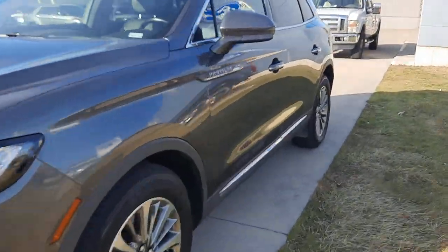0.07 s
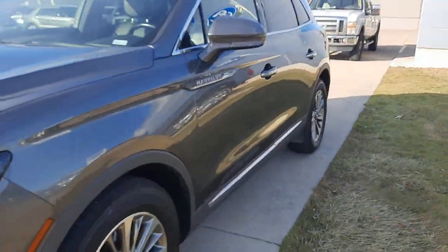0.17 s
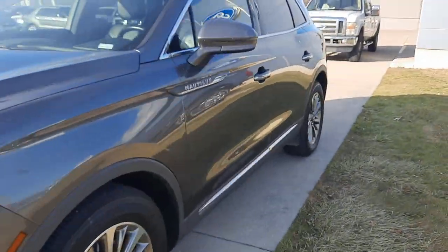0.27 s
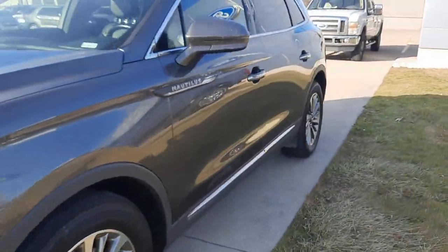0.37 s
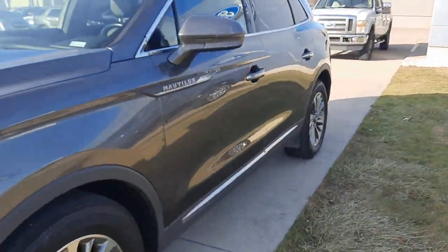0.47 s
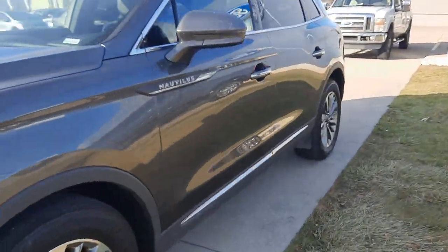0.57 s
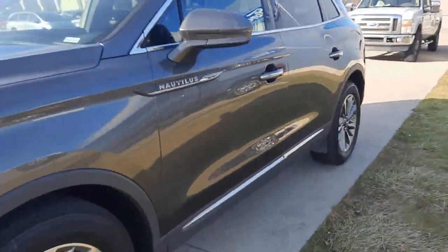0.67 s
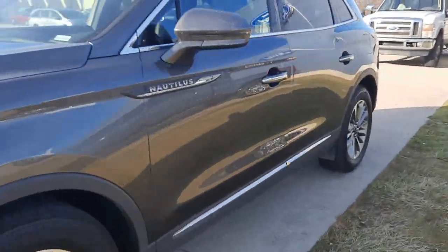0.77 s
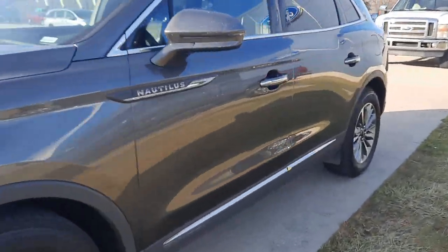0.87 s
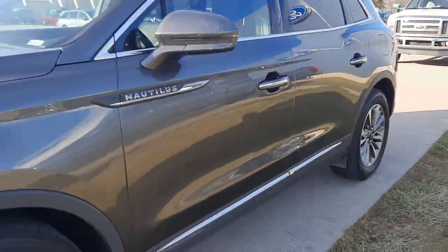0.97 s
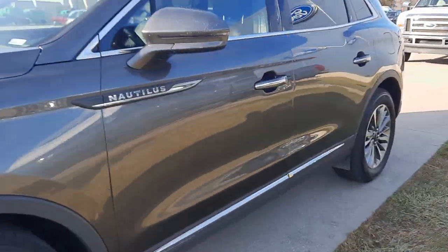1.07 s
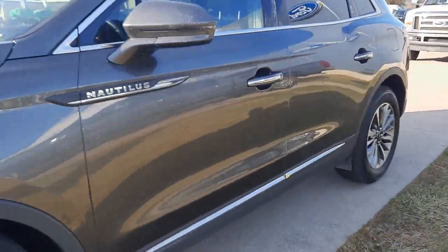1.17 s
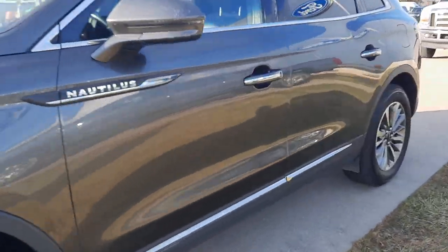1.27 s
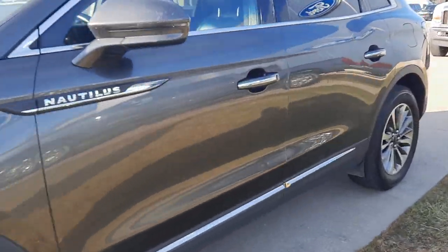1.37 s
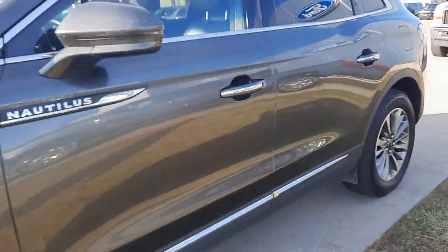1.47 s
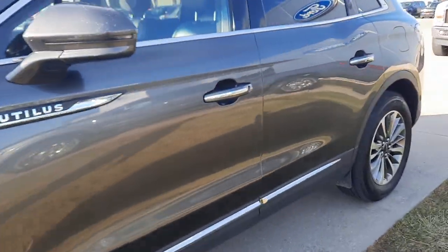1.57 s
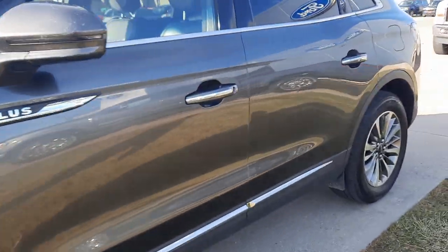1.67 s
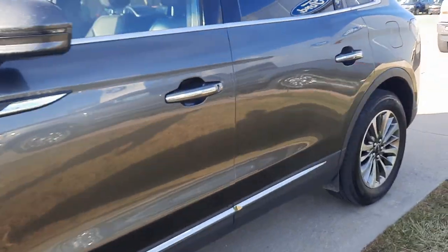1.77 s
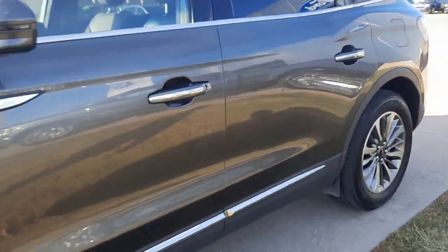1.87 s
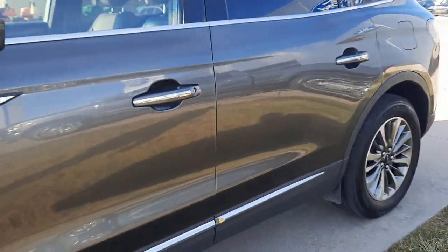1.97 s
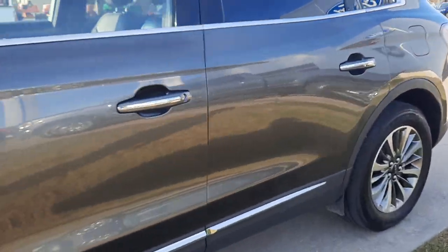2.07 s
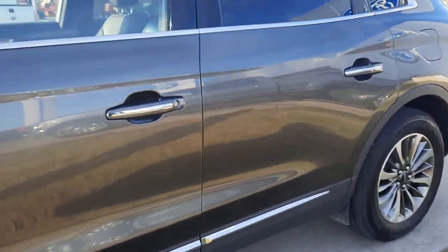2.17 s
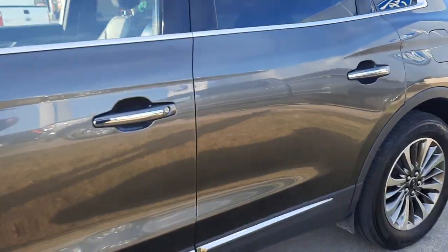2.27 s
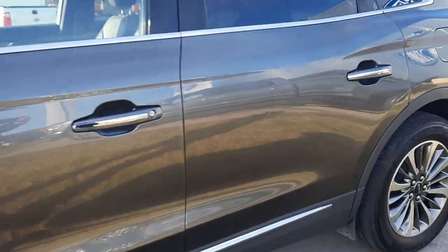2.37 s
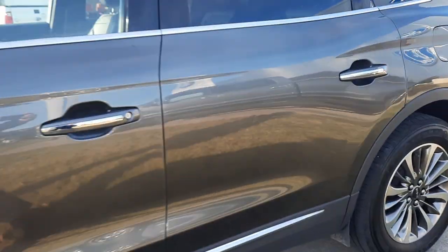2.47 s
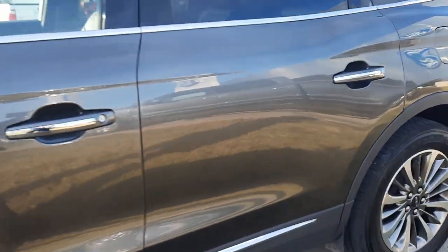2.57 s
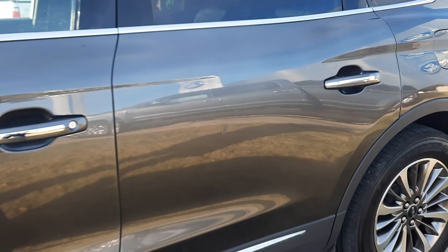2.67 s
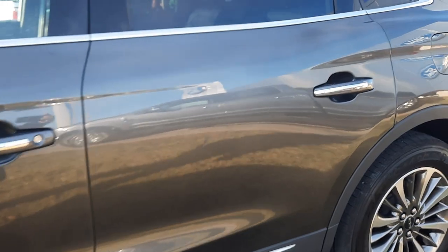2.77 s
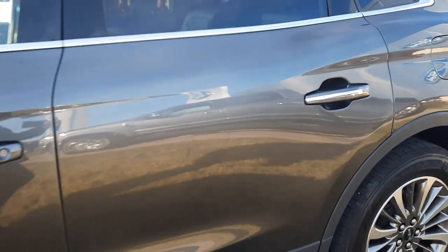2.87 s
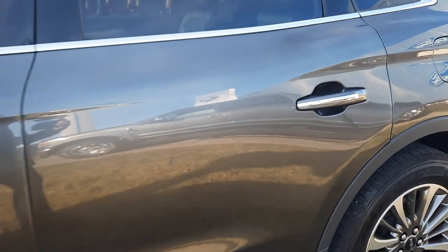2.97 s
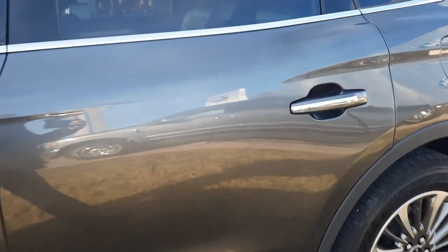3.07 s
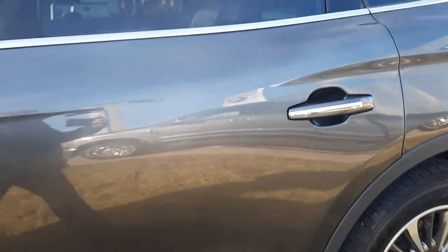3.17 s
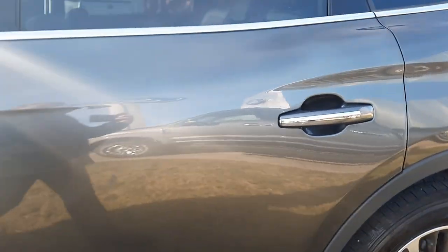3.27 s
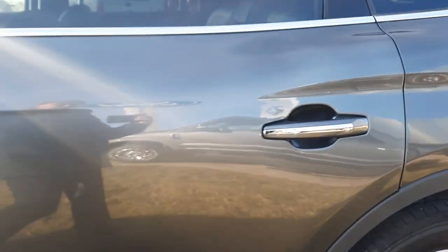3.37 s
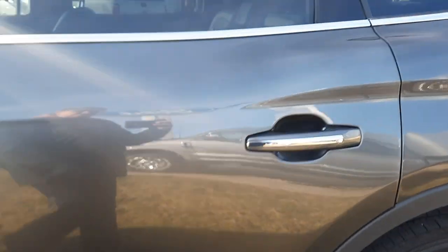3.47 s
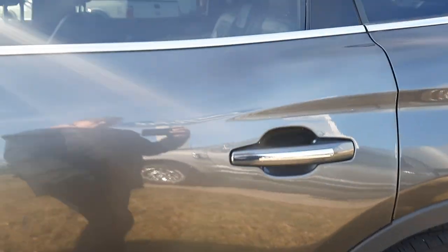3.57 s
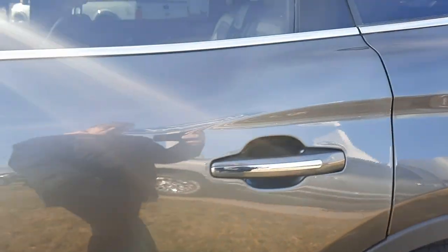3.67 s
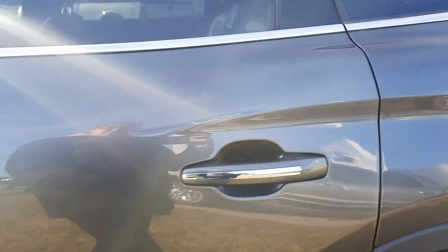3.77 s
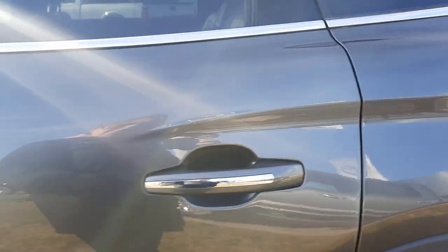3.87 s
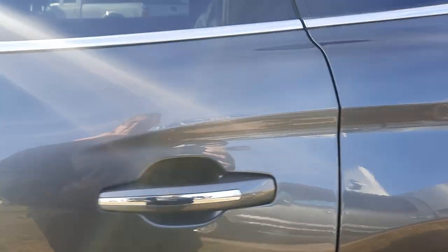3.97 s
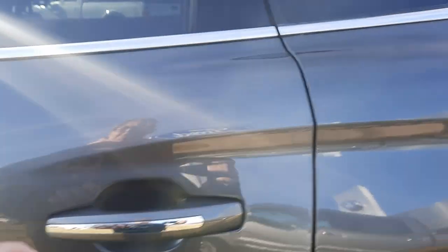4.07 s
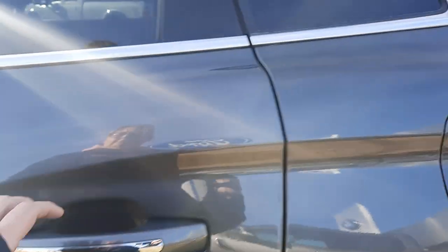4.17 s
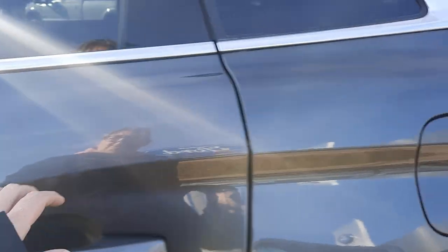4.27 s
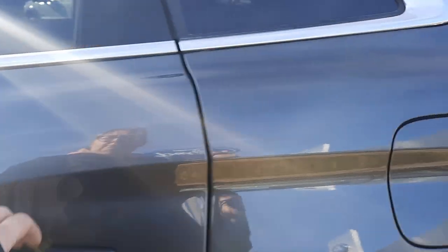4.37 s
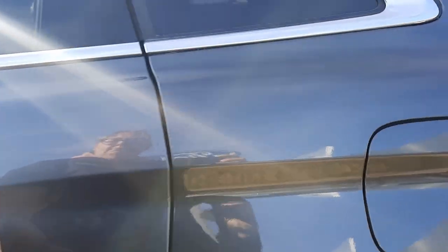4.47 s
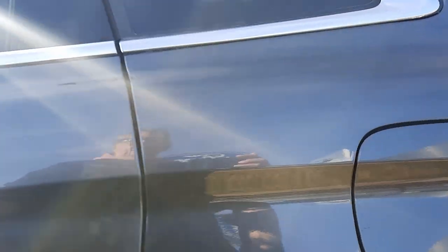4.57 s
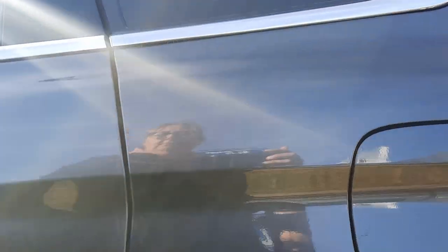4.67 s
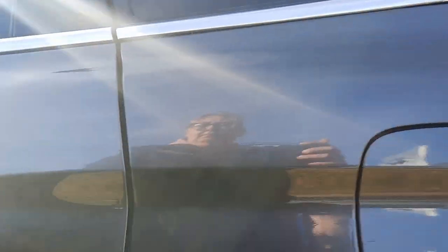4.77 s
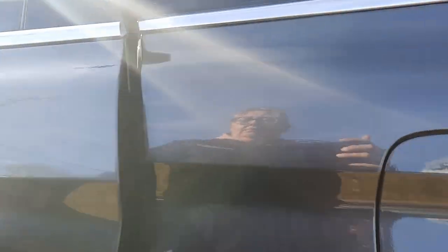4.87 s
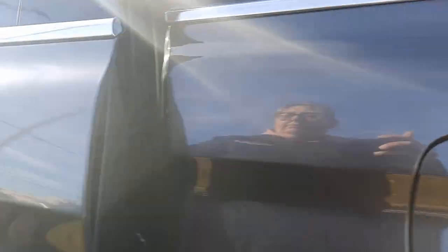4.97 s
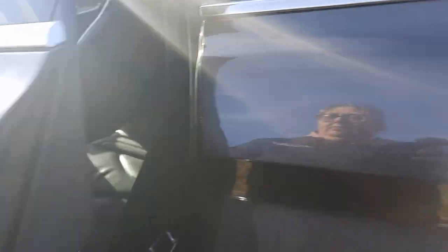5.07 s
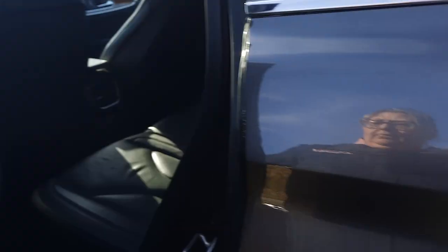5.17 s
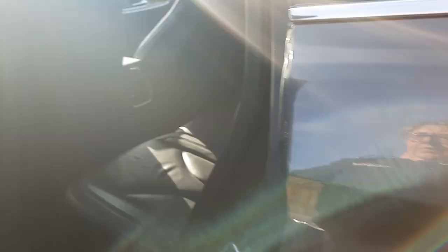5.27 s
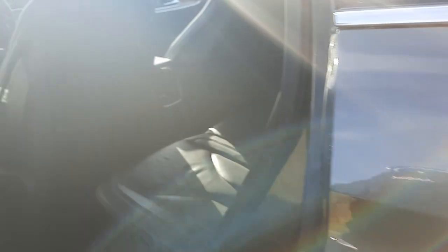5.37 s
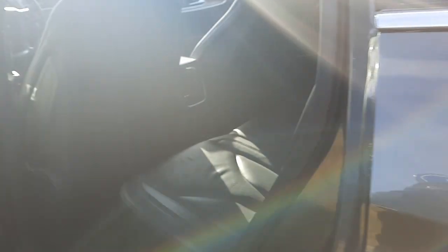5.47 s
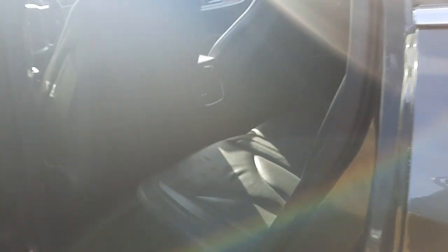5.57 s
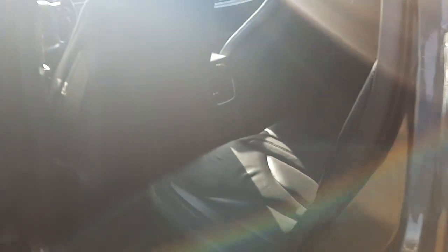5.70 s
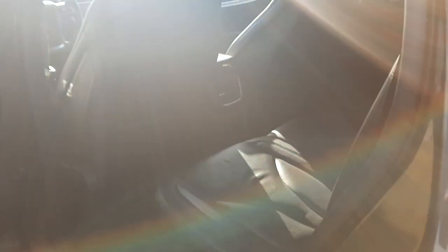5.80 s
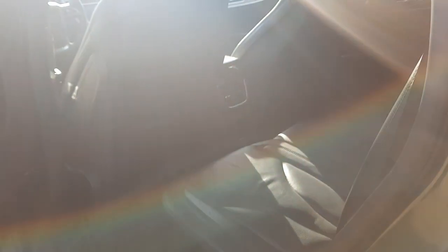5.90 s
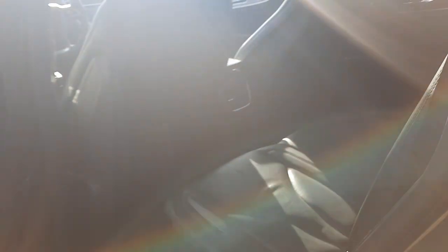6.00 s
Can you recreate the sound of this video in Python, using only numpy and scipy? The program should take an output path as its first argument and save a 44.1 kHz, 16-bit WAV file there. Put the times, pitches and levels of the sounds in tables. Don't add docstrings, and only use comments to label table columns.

```python
import sys
import numpy as np
from scipy import signal
from scipy.fft import rfft, irfft, next_fast_len
from scipy.io import wavfile
from scipy.ndimage import uniform_filter1d, map_coordinates

SR = 44100
rng = np.random.default_rng(int(sys.argv[2]) if len(sys.argv) > 2 else 0)


def volts_from_db(level):
    exponent = np.asarray(level, float) / 20
    return 10 ** exponent


def wav_record(signal):
    frames = np.transpose(np.atleast_2d(signal))
    bounded = np.clip(frames, -1, 1)
    quanta = np.round(bounded * 32767).astype(np.int16)
    wavfile.write(sys.argv[1], SR, quanta)


N = 266187

PORT_LAG = 0.000508
# (time [s], level [dB])
NEAR_LANE = [(0.0, -52), (.5, -52.5), (0.8, -50), (1.3, -50.5), (1.7, -55), (2.2, -53), (3.1, -56),
             (4.0, -57.5), (4.7, -57), (4.95, -58.5), (5.09, -54), (5.3, -57.5), (5.6, -63), (6.04, -56)]


def unit(x):
    return x / np.sqrt(np.mean(x ** 2) + 1e-20)


def along(points, hz):
    f, v = np.transpose(points)
    return np.interp(np.log(hz + 1), np.log(f + 1), v)


def curves(rows):
    s, *cols = np.transpose(np.vstack(rows))
    return np.array([np.interp(np.arange(N) / SR, s, c) for c in cols])


def wobble(rate):
    coarse = np.arange(0, N + 16, 16)
    knots = map_coordinates(rng.standard_normal(int(N * rate / SR) + 4), [coarse * rate / SR])
    return np.interp(np.arange(N), coarse, knots)


def filtered(x, response):
    m = next_fast_len(x.shape[-1] + 2048, real=True)
    spectrum = rfft(x, m) * response(np.fft.rfftfreq(m, 1 / SR))
    return irfft(spectrum, m)[..., :x.shape[-1]]


def later(pair, lag):
    return filtered(pair, lambda hz: np.exp(-2j * np.pi * hz * np.array([[0], [lag]])))


def panned(db):
    return db * np.array([[.5], [-.5]])


def shaded(pair):
    # (frequency [Hz], left over right [dB])
    shade = [(100, 1.5), (700, 4.5), (2400, 1.5), (4400, 0.5), (7500, -4.5), (12000, -1)]
    return filtered(pair, lambda hz: volts_from_db(panned(along(shade, hz))))


def rush(spectrum, patchy_db, lag):
    # (frequency [Hz], left-right likeness [0 to 1])
    alike = [(100, 0.86), (600, 0.64), (1400, 0.62), (2600, 0.37), (5000, 0.27), (13000, 0.16)]
    z = signal.stft(rng.standard_normal((2, N + 512)), nperseg=512)[2]
    field = uniform_filter1d(rng.standard_normal(z.shape[1:]), size=6, axis=0)
    field = uniform_filter1d(field, size=10, axis=1)
    patchy = signal.istft(z * volts_from_db(patchy_db * unit(field)), nperseg=512)[1][:, :N]
    m = next_fast_len(N, real=True)
    a, b = rfft(patchy, m)
    hz = np.fft.rfftfreq(m, 1 / SR)
    turn = np.arccos(np.clip(along(alike, hz), -1, 1)) / 2
    mid, side = a * np.cos(turn), b * np.sin(turn)
    delay = np.exp(-2j * np.pi * hz * lag)
    pair = volts_from_db(along(spectrum, hz)) * [mid + side, (mid - side) * delay]
    return unit(irfft(pair, m)[:, :N])


def add(track, s, sound):
    part = track[..., round(s * SR):][..., :sound.shape[-1]]
    part += sound[..., :part.shape[-1]]


def distances(s, half):
    t = np.arange(0, N + 64, 64) / SR
    return t, np.abs(t - s[:, None]) / np.abs(half[:, None])


def traffic():
    # (time [s], roar [dB])
    road = [(0.0, -44), (0.42, -47), (0.79, -43), (1.35, -44), (1.49, -41), (1.62, -45), (1.75, -43),
            (2.1, -47), (3.0, -44), (3.75, -47), (4, -44.5), (4.16, -48.5), (4.44, -45), (5.09, -48),
            (5.3, -46.5), (6.04, -48)]
    # (frequency [Hz], level [dB per Hz])
    roar_color = [(200, -53), (260, -1), (330, 4), (430, -4.5), (600, -11.5), (800, -15.5), (1000, -17.5),
                  (1300, -32)]
    tyre_color = [(700, -11), (950, -2.5), (1300, 0.5), (1700, -2.5), (1950, -7), (2800, -11.5),
                  (4200, -11.5), (16000, -24)]
    self_noise_color = [(2000, -20), (4000, -4.5), (7000, 3), (10000, 5), (16000, -11)]
    roar_db, = curves(road)
    hiss_db, = curves(NEAR_LANE)
    roar = volts_from_db(roar_db + 3 + 1.3 * wobble(9)) * rush(roar_color, patchy_db=3.5, lag=0.000241)
    self_noise = volts_from_db(-56.0) * rush(self_noise_color, patchy_db=1.5, lag=PORT_LAG)
    tyres = volts_from_db(hiss_db + 6 + 0.67 * wobble(7)) * rush(tyre_color, patchy_db=1.8, lag=0.000441)
    return roar + self_noise + tyres


def rubbing():
    # (time [s], half length [s], swish [dB], fine hiss over swish [dB])
    rubs = [(.07, .15, -63, -2), (0.398, .07, -57.5, -13), (0.657, 0.081, -55, -2), (0.75, .09, -53.5, -8),
            (0.922, 0.03, -56.5, -6), (1.38, 0.18, -57, 9.5), (1.522, .08, -57.5, 11),
            (2.008, 0.11, -57.5, 1), (2.28, 0.092, -64, -7), (2.4, .12, -64, -1), (2.493, 0.017, -49.5, -5),
            (2.532, 0.034, -48.5, 1.5), (2.778, 0.14, -52.5, -5), (2.893, .04, -50.5, 0),
            (3.015, 0.14, -55.5, -3), (3.107, .06, -61, 10), (3.236, 0.037, -57, 5), (3.345, .11, -54, 3),
            (3.52, .05, -60, 10.5), (3.61, .1, -61, 9), (4.03, .12, -61, 3), (4.333, .1, -59, 4),
            (4.493, 0.045, -57.5, 5), (4.79, 0.12, -53.5, 2), (4.89, .04, -59, 7), (5.022, .09, -58.5, 6),
            (5.138, 0.15, -54.5, 1.5), (5.252, 0.058, -52.5, 0), (5.413, 0.023, -57, -1.2),
            (5.923, 0.055, -62.5, 11)]
    last_rub = (6, 0.06, -54.5, -2)
    fade_db, flatness, rest_db = 12.5, 1.36, -76
    s, half, db, fine_db = np.transpose(rubs + [last_rub])
    t, far = distances(s, half)
    gains = []
    for top_db in (db, db + fine_db):
        each = volts_from_db(top_db[:, None] - fade_db * far ** flatness)
        gains.append(np.interp(np.arange(N) / SR, t, volts_from_db(rest_db) + each.max(axis=0)))
    return gains


def clothes():
    # (frequency [Hz], level [dB per Hz])
    swish_color = [(2500, -10), (4200, -7), (5500, -2), (6800, 0), (8500, -4.5), (11000, -7)]
    fine_color = [(7000, -14), (10000, -2.5), (13000, 1), (16000, -4.5)]
    # (time [s], length [s], from [Hz], to [Hz], level [dB])
    squeaks = [
        (2.8, .025, 15500, 14200, -42),
        (2.405, .012, 15200, 14000, -50),
    ]
    swish, fine = rubbing()
    rub = wobble(30)
    out = swish * volts_from_db(7.5 + 1.0 * rub) * rush(swish_color, patchy_db=3.0, lag=PORT_LAG)
    out = out + fine * volts_from_db(0.5 + 0.98 * rub) * rush(fine_color, patchy_db=3.5, lag=PORT_LAG)
    for s, length, from_hz, to_hz, db in squeaks:
        hz = np.linspace(from_hz, to_hz, round(length * SR))
        add(out, s, volts_from_db(db) * np.hanning(len(hz)) * np.sin(2 * np.pi * np.cumsum(hz) / SR))
    return out


def ducking(rows):
    s, half, depth_db = np.transpose(rows)
    t, far = distances(s, half)
    cut_db = (depth_db[:, None] * np.clip(1 - far, 0, 1)).max(axis=0)
    return np.interp(np.arange(N) / SR, t, cut_db)


def bass_level():
    # (time [s], strength [dB])
    wind_strength = [(0.0, -41), (0.2, -38), (0.5, -44), (1.06, -40.5), (1.55, -35.5), (1.81, -29.5),
                     (2.06, -41), (2.28, -34), (2.6, -35.5), (2.84, -31.5), (3.16, -37.5), (4.1, -38.5),
                     (4.63, -35), (5.18, -30.5), (5.38, -26), (5.52, -34), (5.76, -26.5), (5.88, -38)]
    # (time [s], half length [s], depth [dB])
    left_ducks = [(.05, 0.088, 27), (.3, .08, 20), (.42, 0.063, 22), (1.282, .04, 9), (1.382, .05, 13),
                  (1.46, .05, 12), (1.55, .04, 8), (1.9, .04, 8), (1.61, 0.045, 9), (1.68, 0.052, 30),
                  (1.81, 0.11, 21), (1.98, 0.081, 15), (2.43, 0.12, 30), (2.49, 0.053, 22),
                  (2.66, 0.092, 19), (2.77, .07, 28), (2.89, 0.044, 8), (3.09, 0.037, 6), (3.51, .05, 6),
                  (3.635, .05, 6), (4.774, 0.036, 4), (5.911, .04, 10), (3.88, 0.057, 37),
                  (4.02, 0.067, 14), (4.15, 0.11, 30), (4.54, 0.087, 17), (5.06, 0.082, 19),
                  (5.25, .07, 34), (5.4, 0.16, 9), (5.65, .03, 19), (5.79, 0.085, 9)]
    right_ducks = [(.341, .05, 8), (.452, 0.037, 5.5), (.863, .05, 10), (1.382, .04, 6), (3.11, .06, 8.2),
                   (3.581, .04, 10), (4.584, .04, 6), (5.262, 0.045, 7.3), (2.97, .04, 7), (1.88, .04, 8),
                   (5.69, 0.034, 6), (5.874, .04, 7), (1.64, 0.04, 10), (2.46, 0.036, 12), (2.9, 0.06, 20),
                   (3.51, 0.042, 17), (3.65, 0.064, 13), (3.88, 0.042, 5.9), (5.06, 0.084, 7),
                   (5.65, 0.033, 12), (6.03, 0.075, 7.8)]
    return curves(wind_strength) - [ducking(left_ducks), ducking(right_ducks)]


def wind(level_db):
    # (frequency [Hz], level [dB per Hz])
    gust = [(20, -46), (45, -5), (80, 0), (130, -2.5), (200, -7), (245, -11), (280, -63)]
    spill_color = [(220, -40), (270, 0.5), (360, -3), (500, -23), (1000, -50)]
    windy = np.clip((level_db.max(axis=0) + 42) / 12, 0, 1)
    own = unit(filtered(rng.standard_normal((2, N)), lambda hz: volts_from_db(along(gust, hz))))
    mix = np.sqrt(1 - windy) * rush(gust, patchy_db=1.5, lag=0.00027) + np.sqrt(windy) * own
    lumps = volts_from_db(3.3 * np.array([wobble(22.03), wobble(22)]))
    spill = unit(filtered(rng.standard_normal((2, N)), lambda hz: volts_from_db(along(spill_color, hz))))
    return volts_from_db(level_db + 0.1) * unit(lumps * mix) + volts_from_db(level_db - 12.5) * windy ** 2 * lumps * spill


def hum(level_db):
    # (time [s], level [dB])
    swells = [(0.0, -61), (0.57, -49), (1.09, -41.5), (1.25, -55), (1.78, -51), (2.21, -40.5), (2.43, -51),
              (2.75, -47.5), (2.98, -42), (3.19, -47.5), (3.37, -40), (3.49, -51.5), (4.14, -53),
              (4.43, -44.5), (4.71, -41.5), (5.15, -43.5), (5.25, -53), (5.8, -41.5)]
    # (multiple of the main tone, level [dB])
    hum_parts = [(1, 2), (2, -13.5), (2.5, -24), (.4, -4)]
    turn = 2 * np.pi * 199.1 * np.arange(N) / SR
    parts = [volts_from_db(db + 1.46 * wobble(4.99)) * np.sin(k * turn + 0.59 * wobble(6)) for k, db in hum_parts]
    return volts_from_db(curves(swells) + 1.5 + np.minimum(level_db + 44.5, 0)) * sum(parts)


def whine():
    # (frequency [Hz], level [dB])
    whine_lines = [(1205, -60), (1258, -60), (1340, -65), (1998, -64.5)]
    lane_db, = curves(NEAR_LANE)
    t = np.arange(N) / SR
    lines = 0
    for hz, db in whine_lines:
        lines = lines + volts_from_db(db + 3.6 * wobble(4)) * np.sin(2 * np.pi * hz * t + 1.6 * wobble(12))
    return later(volts_from_db(1.5 * (lane_db - lane_db.max())) * np.array([lines, lines]), 0.0004)


def puffs():
    # (time [s], peak [dB], frequency [Hz], left over right [dB])
    pushes = [(.137, -33, 300, -2.5), (.142, -25, 150, -3), (.239, -37, 134, -7), (.576, -40, 64, -3),
              (.654, -36, 80, 1.5), (.81, -37, 69, 1.5), (.953, -33, 69, 1.5), (1.05, -33, 70, 1.5),
              (1.113, -38, 118, -1.5), (1.2, -34, 75, -1.5), (1.33, -33, 65, -1.5), (1.495, -34, 80, -4),
              (1.594, -30, 220, -3), (1.666, -35, 430, -1.5), (1.734, -28, 150, -5), (1.747, -32, 320, -3),
              (1.79, -35, 118, -9), (1.828, -35, 69, -12), (2.275, -31, 96, 1.5), (2.645, -34, 100, -8),
              (2.687, -31, 200, -2.5), (2.704, -29, 240, -2.5), (2.792, -32, 86, -11),
              (2.838, -31, 64, 2.5), (3.294, -35, 75, 1.5), (3.363, -34, 86, -1.5), (3.46, -29, 102, -7),
              (3.753, -31, 107, 1.5), (3.822, -35, 91, -1), (3.921, -35, 75, -5), (4.039, -41, 91, -12),
              (4.089, -37, 64, -5), (4.409, -36, 102, 1.5), (4.478, -33, 86, 1.5), (4.97, -29, 91, 1.5),
              (5.145, -31, 150, -1.5), (5.173, -29, 190, -1.5), (5.188, -33, 130, -1.5),
              (5.315, -25, 140, -2.5), (5.328, -30, 260, -1.5), (5.352, -27, 110, -1.5),
              (5.369, -23, 120, -2.5), (5.387, -25, 113, -2.5), (5.45, -27, 120, -2.5),
              (5.472, -30, 110, -1.5), (5.7644, -24, 230, -3), (5.827, -31, 86, 1.5), (5.982, -32, 80, 1.5)]
    half_cycles = .55
    out, t = np.zeros((2, N)), np.arange(-SR // 25, SR // 25) / SR
    for s, db, hz, pan_db in pushes:
        push = -np.cos(2 * np.pi * hz * t) * np.exp(-(t * hz / half_cycles) ** 2)
        add(out, s + t[0], volts_from_db(db + panned(pan_db)) * push)
    return later(out, .00025)


def contacts():
    # (time [s], peak [dB], frequency [Hz], width [Hz], t60 [s])
    pebbles = [
        (.7389, -23, 1400, 3800, .0008),
        (.7398, -33, 500, 900, .002),
    ]
    # (time [s], peak [dB])
    finger_taps = [(2.8497, -38), (3.283, -35), (3.943, -39), (4.0062, -39), (4.0586, -38), (4.1894, -39),
                   (4.2126, -36.5), (4.3026, -35), (4.345, -37.5), (5.7414, -30)]
    # (time [s], peak [dB], frequency [Hz], t60 [s], edge over dull part [dB])
    clicks = [(4.4875, -35, 1500, .015, -3), (4.7383, -34, 2400, .02, -2.5),
              (4.7986, -30.5, 2300, 0.03, -2.2), (4.8413, -19.5, 2000, .025, -5),
              (4.848, -27, 2500, .045, 2.5), (5.4088, -31.5, 1800, 0.028, -4)]
    # (time [s], peak [dB], frequency [Hz], width [Hz], t60 [s])
    snaps = [(2.9935, -21.5, 1200, 1700, 0.00087), (5.2462, -30, 940, 1400, 0.034),
             (5.2473, -30, 6500, 3200, .008), (4.8231, -35, 2400, 1200, .015),
             (2.535, -35, 6500, 3000, .02), (4.866, -37, 2100, 1500, .04),
             (2.4897, -31.5, 5650, 450, 0.022), (2.868, -34.5, 6600, 1800, 0.071),
             (2.868, -35, 13500, 6000, .065), (4.837, -23, 6360, 3200, 0.043),
             (4.842, -29, 13500, 6000, .02), (5.5049, -36, 2700, 4500, .002),
             (5.52, -42, 1400, 1500, 0.078), (5.6473, -43, 1300, 500, .02), (6.026, -35, 3200, 2500, 0.012)]
    # (time [s], peak [dB], frequency [Hz], width [Hz], t60 [s])
    rebounds = [
        (5.5486, -7.5, 2600, 5000, 0.0018),
        (5.5552, -16, 2200, 2500, .004),
    ]
    taps = [(s, db - 1.2, 1500, 1300, .0025, .47) for s, db in finger_taps]
    dull = [(s, db, hz, 2300, t60, .43) for s, db, hz, t60, _ in clicks]
    edges = [(s + 0.000807, db + over_db, 6900, 4000, .016, .44) for s, db, _, _, over_db in clicks]
    small = [(*row, .48) for row in snaps + rebounds]
    return taps + dull + edges + small + [(*row, .13) for row in pebbles]


def ticks():
    out, t = np.zeros((2, N)), np.arange(SR // 10) / SR
    rows = contacts()
    grits = rng.standard_normal((len(rows), 3, len(t)))
    for (s, db, hz, width_hz, t60, lag_ms), grit in zip(rows, grits):
        ring = lambda f: (1j * f * width_hz / (hz * hz - f * f + 1j * f * width_hz)) ** 2
        push = grit[0] + .5 * grit[1:] + 7 * (t == 0)
        click = later(filtered(push * volts_from_db(-60 * t / t60), ring), lag_ms / 1000)
        add(out, s, volts_from_db(db + 4.5) * click / np.abs(click).max())
    return shaded(out)


def insect():
    # (frequency [Hz], width [Hz], level [dB])
    trill_bands = [(2720, 130, 1), (3880, 250, -2.5), (4520, 250, -1)]
    middle_s, half_s, pulses_per_s = 2.38, .33, 25.2
    t = np.arange(round(2 * half_s * SR)) / SR
    pulses = np.hanning(len(t)) ** .5 * np.sin(np.pi * pulses_per_s * t + .9) ** 4
    bands = lambda f: sum(volts_from_db(db) * np.exp(-((f - hz) / width) ** 2) for hz, width, db in trill_bands)
    shared, left, right = unit(filtered(rng.standard_normal((3, len(t))), bands))
    out = np.zeros((2, N))
    add(out, middle_s - half_s, volts_from_db(-53.5) * pulses * (shared + .8 * np.array([left, right])))
    return out


def thumps():
    # (time [s], peak [dB], frequency [Hz], t60 [s])
    shove = [(2.6913, -20, 99, 0.037)]
    latch = [(4.8035, -20.5, 300, 0.048), (4.82, -22, 250, 0.053), (4.826, -20, 326, 0.026),
             (4.835, -21, 190, .07), (4.835, -22, 109, .08), (4.839, -21.5, 520, 0.035),
             (4.838, -28.5, 862, .05), (4.852, -20.5, 402, .044), (4.862, -20.5, 323, 0.047),
             (4.884, -24.5, 466, 0.051), (4.887, -25.5, 185, .044), (4.886, -35, 940, 0.062),
             (4.903, -34, 512, 0.046), (4.905, -28, 301, 0.085), (4.838, -29, 1057, 0.049),
             (4.838, -35, 1400, 0.044), (4.853, -31, 638, 0.043), (4.853, -34, 810, 0.033),
             (4.872, -32, 600, 0.044), (4.886, -34, 780, 0.038), (4.905, -29, 90, 0.084),
             (4.806, -31, 498, .04)]
    heave = [(4.8322, -7, 297, 0.032)]
    knocks = [(5.2475, -26.5, 340, 0.033)]
    jolt = [(5.5538, -12, 110, 0.056), (5.55, -22, 331, 0.11), (5.553, -24.5, 170, .17),
            (5.573, -31, 640, 0.07), (5.569, -18, 306, .16), (5.5984, -27, 306, .085),
            (5.6, -29, 110, 0.062)]
    bumps = [(5.672, -28, 90, 0.078), (5.753, -28.5, 294, .05), (5.772, -25, 88, 0.064)]
    # (blows, rise over t60, left over right dB)
    groups = [(latch, 0.079, 2), (jolt, 0.065, .6), (bumps, 0.11, -3.5),
              (heave, 0.71, 2.5), (shove, .57, -2.2), (knocks, 0.075, 3.7)]
    out, t = np.zeros((2, N)), np.arange(SR // 6) / SR
    for blows, share, pan_db in groups:
        for s, db, hz, t60 in blows:
            swell = (1 - np.exp(-t / (share * t60))) ** 2 * volts_from_db(-60 * t / t60)
            mode = lambda f: (f * hz / (hz * hz - f * f + 1.2j * f * hz)) ** 2
            rub = unit(filtered(rng.standard_normal(len(t)), mode))
            tone = np.sin(2 * np.pi * hz * t) + 0.28 * rub
            add(out, s, volts_from_db(db + panned(pan_db)) * swell / swell.max() * tone)
    return later(out, 0.00029)


def seal():
    # (time [s], level [dB])
    peeling = [(4.77, -51), (4.8, -41), (4.83, -38), (4.843, -34), (4.86, -34), (4.88, -37.5), (4.895, -39),
               (4.915, -47), (4.95, -57)]
    # (frequency [Hz], level [dB per Hz])
    peel_color = [(150, -20), (300, 2), (550, -2.5), (900, -7), (1400, -14), (2400, -15.5), (3500, -33),
                  (8000, -36)]
    rough = volts_from_db(4.5 * wobble(150)) * rng.standard_normal(N)
    peel = volts_from_db(curves(peeling)) * unit(filtered(rough, lambda hz: volts_from_db(along(peel_color, hz))))
    return later(peel * volts_from_db([[1.6], [-1.6]]), 0.00031)


def stay():
    # (frequency [Hz], level [dB], t60 [s])
    steel = [(495.5, -5, 0.18), (672, -4, 0.12), (800, -9, .08), (1000, -8, 0.097), (1337, -7.5, 0.07),
             (1630, -13, .07), (1875, -2, 0.065), (2000, -7.5, 0.092), (2187, -9.5, 0.105),
             (2310, -13, .07), (3500, -2, 0.045), (4300, -15, 0.045), (5800, -6, .035), (7200, -11, .045)]
    # (frequency [Hz], level [dB])
    crack_color = [(300, -5), (1000, -0.5), (1700, -3.5), (2900, -3.5), (4900, -8), (6100, -1), (8000, -11),
                   (15500, -19.5)]
    # (frequency [Hz], t60 [s])
    crack_t60 = [(400, .15), (2000, 0.095), (6000, 0.062), (13000, 0.046)]
    t = np.arange(SR // 3) / SR
    shake = lambda: wobble(160)[:len(t)]
    ring = 0
    for hz, db, t60 in steel:
        swell = 1 - np.exp(-t * hz / 1.6)
        level = volts_from_db(db - 60 * t / t60 + 2.5 * shake())
        phase = rng.uniform(0, 2 * np.pi) + .45 * shake()
        ring = ring + level * swell * np.sin(2 * np.pi * hz * t + phase)
    shared, left, right = rng.standard_normal((3, len(t)))
    hz, u, z = signal.stft([shared + 0.76 * left, shared + 0.68 * right], SR, nperseg=128)
    fade_db = along(crack_color, hz)[:, None] - 60 * u / along(crack_t60, hz)[:, None]
    crack = signal.istft(z * volts_from_db(fade_db), SR, nperseg=128)[1][:, :len(t)]
    snap = 1 + 2.13 * volts_from_db(-60 * t / 0.014)
    clack = volts_from_db(-6) * (1 - np.exp(-t / 0.00033)) * (volts_from_db(-8) * ring + volts_from_db(-2.5) * snap * crack)
    out = np.zeros((2, N))
    add(out, 5.5482, later(shaded(clack), PORT_LAG))
    return out


def scene():
    level_db = bass_level()
    background = traffic() + wind(level_db) + hum(level_db) + whine() + insect()
    walker = clothes() + puffs() + ticks()
    door = thumps() + seal() + stay()
    return background + walker + door


def low_pass(x):
    return signal.sosfilt(signal.butter(12, 16640, fs=SR, output="sos"), x)


def record(dry):
    # (frequency [Hz], level [dB])
    left_port = [(300, -1), (600, 2.5), (1500, 0), (7000, -3), (10000, -8), (13500, 5.5), (15700, -1)]
    right_port = [(300, -2), (600, 1), (1500, 0), (7000, -2), (9500, -16), (13500, 5.5), (15700, -3.5)]
    x = filtered(dry, lambda hz: volts_from_db([along(left_port, hz), along(right_port, hz)]))
    x = x / (1 + np.abs(x / .95) ** 6) ** (1 / 6)
    mix = filtered(x, lambda hz: hz < 15850)
    return low_pass(mix)


dry = scene()
out = record(dry)
wav_record(out)
```